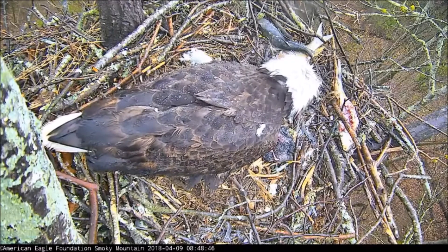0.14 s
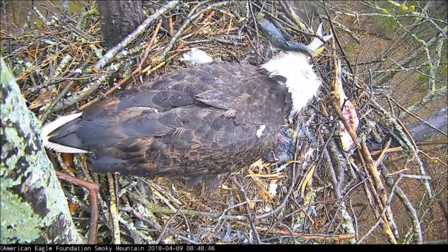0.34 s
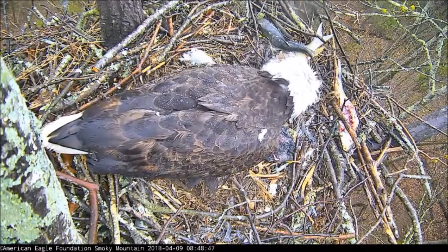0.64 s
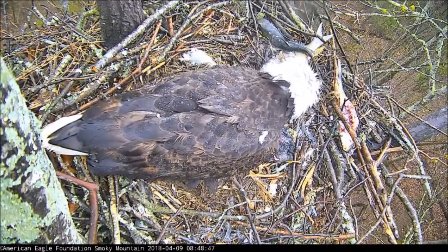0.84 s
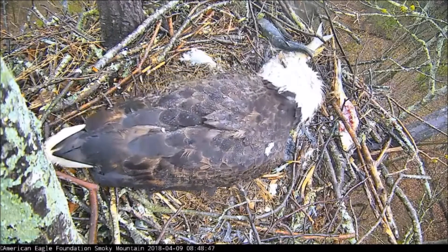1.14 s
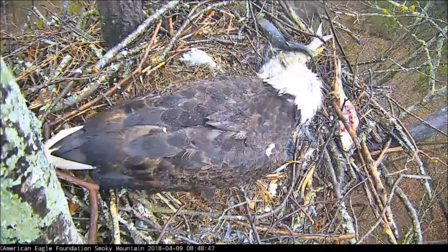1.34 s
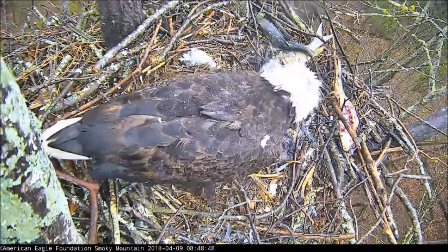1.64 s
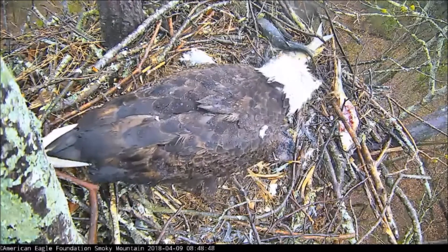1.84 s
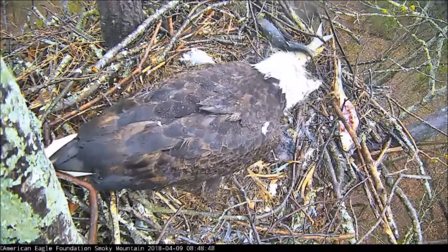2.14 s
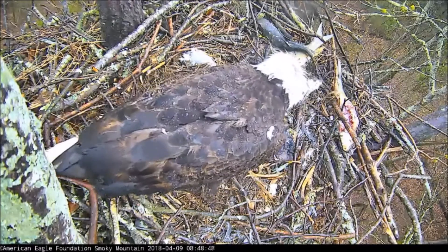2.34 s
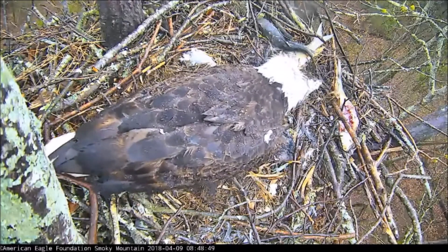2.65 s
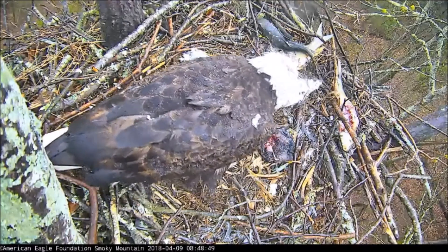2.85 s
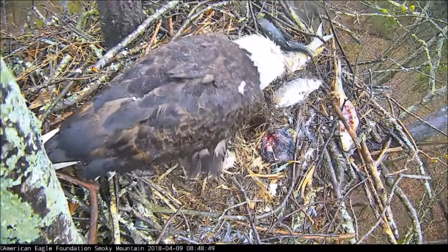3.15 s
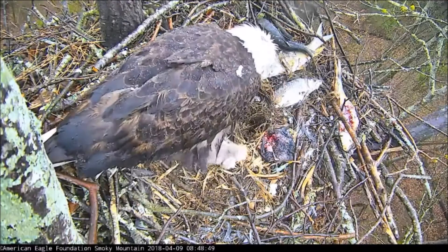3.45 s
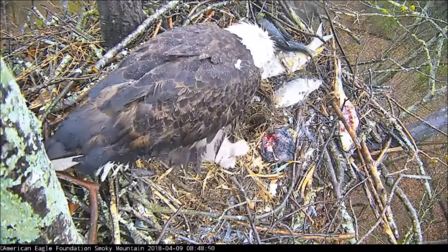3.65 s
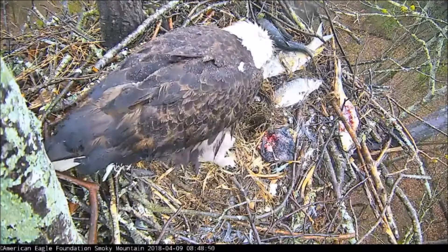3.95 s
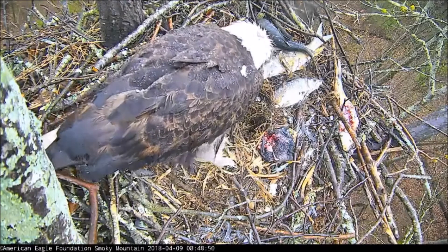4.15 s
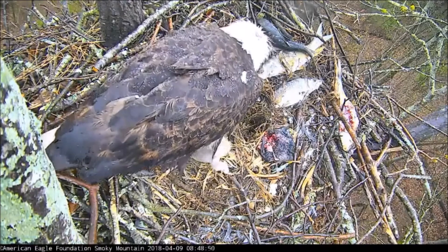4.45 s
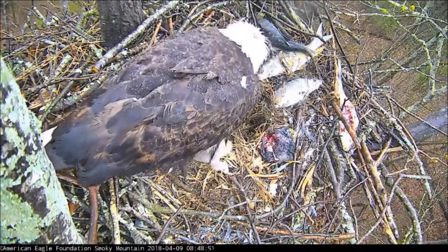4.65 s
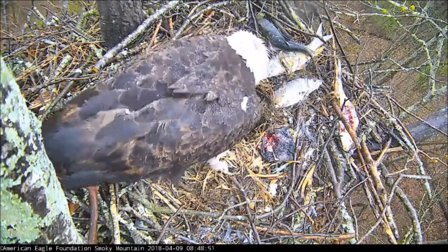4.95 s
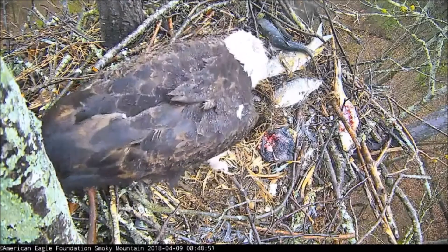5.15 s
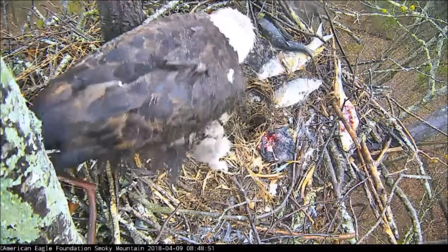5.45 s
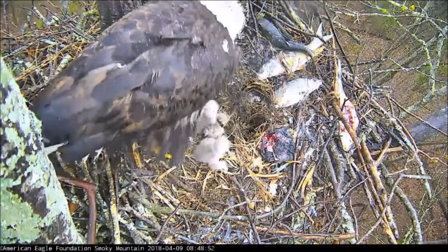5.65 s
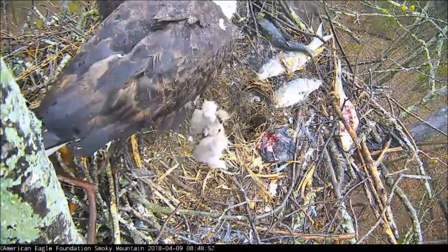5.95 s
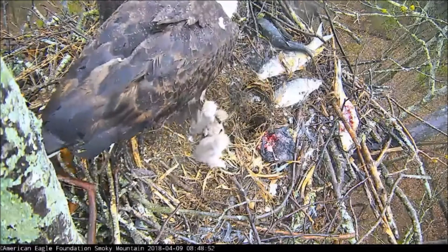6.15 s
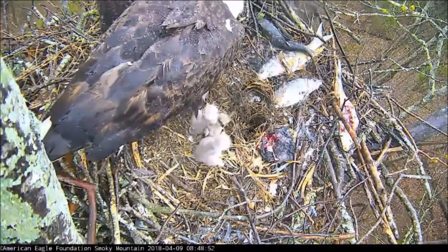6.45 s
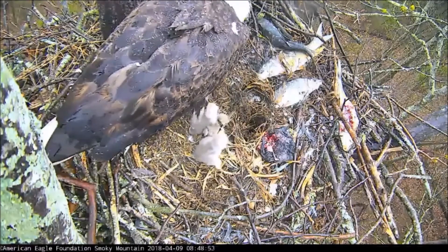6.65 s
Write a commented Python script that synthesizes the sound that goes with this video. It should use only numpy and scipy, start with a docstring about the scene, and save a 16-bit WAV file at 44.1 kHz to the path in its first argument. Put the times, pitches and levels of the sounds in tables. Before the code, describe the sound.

Steady wind rushes through a housed outdoor microphone, hollow and ringing in the upper mids, with slight hiss and whine. Over it, two young chicks call: wavering rising peeps, sliding whistles and fluttering twitters crowd the middle, followed by one longer cry that turns a little harsh. A few short twitters follow, then mostly wind and faint distant birds remain. Loud calls leave soft bass thumps and a brief diffuse echo.

```python
"""Eagle chicks peep, whistle, twitter and give one long arched cry in a treetop nest.
Their calls are near-sine glides with wavering pitch, fluttering level and breath; peeps add side tones.
Small songbirds call further off, over a faint chorus; the woods return a short diffuse echo.
Behind them, banded noise makes a rush of wind coloured by the ring of a boxed microphone's housing,
with a thin electronic whine and hiss; the uneven amplifier turns loudness into soft bass thumps."""
import sys
import numpy as np
from scipy import signal
from scipy.fft import rfft, irfft, next_fast_len
from scipy.io import wavfile
from scipy.ndimage import uniform_filter1d

SR = 44100
rng = np.random.default_rng(int(sys.argv[2]) if len(sys.argv) > 2 else 0)


def put_to_file(sound):
    """Save the sound as 16-bit audio at rate SR, in the file named by the first command-line argument."""
    columns = np.atleast_2d(sound).T  # one column per channel
    safe = np.clip(columns, -1, 1)
    whole_steps = np.round(safe * 32767)
    wavfile.write(sys.argv[1], SR, whole_steps.astype(np.int16))


N = 299439


def undb(db):
    """Decibels to gain."""
    return 10 ** (np.asarray(db) / 20)


def unit(x):
    """Scale to rms 1."""
    return x / np.sqrt(np.mean(x ** 2))


def walk(rate):
    """Smooth random wander, about rate turns a second, rms 1."""
    width = int(SR / rate)
    smooth = uniform_filter1d(rng.standard_normal(N), width)
    return unit(uniform_filter1d(smooth, width))


WHINE_HZ = 2729
WHINE_DB = -41.5  # the level wanders around this


def whine():
    """A thin steady tone of the electronics; its level wanders."""
    tone = np.sqrt(2) * np.sin(2 * np.pi * WHINE_HZ * np.arange(N) / SR)
    return tone * undb(WHINE_DB + 3.1 * walk(5.3))


# wind in the trees, level of its 700-2200 Hz part: (time [s], level [dB])
RUSH_LEVEL = [(0.0, -34), (0.32, -32.5), (1.0, -32.5), (1.93, -32), (2.72, -31), (3.03, -31.5), (3.74, -30),
              (5.26, -30.5), (5.79, -30.5), (6.47, -32), (6.79, -31.5)]
# relative spectrum of the wind before the housing rings: (frequency [Hz], density [dB per Hz])
RUSH_COLOUR = [(35, -61), (60, -24.5), (96, -18), (133, -21.5), (184, -21.5), (216, -23.5), (325, -22),
               (518, -21.5), (811, -10.5), (1400, -9), (1520, -6.5), (2590, -3.5), (3730, -14),
               (6460, -42.5), (7760, -57.5), (10100, -92), (17100, -120)]
# resonances of the microphone housing: (frequency [Hz], width [Hz], level [dB])
HOUSING_RINGS = [(2580, 180, -5), (2993, 840, -0.5), (4055, 200, -6.5)]
BASS_BANDS = 10  # half-octave bands from 16 Hz that buffet together
RUSH_ABOVE_DB = 6  # whole rush over its 700-2200 Hz part


def rush(flicker_db=1.38, swell_db=-0.35, buffet_db=2.0):
    """Wind noise in half-octave bands: all swell together, each flickers alone, the bass buffets as one."""
    size = next_fast_len(N)
    f = np.maximum(np.arange(size // 2 + 1) * SR / size, 1)
    hz, colour_db = np.transpose(RUSH_COLOUR)
    ring = sum(undb(ring_db) / (1 + ((f - ring_hz) / (width_hz / 2)) ** 2)
               for ring_hz, width_hz, ring_db in HOUSING_RINGS)
    colour = undb(np.interp(np.log(f), np.log(hz), colour_db))
    air = rfft(rng.standard_normal(size)) * colour * (1 + ring)
    swell = swell_db * walk(1.9)
    buffet = buffet_db * walk(16.0)
    out = 0
    for step in range(20):
        share = np.clip(1 - abs(2 * np.log2(f / 16) - step), 0, 1)  # overlapping triangular bands
        band = irfft(air * share, size)[:N]
        motion_db = swell + buffet * (step < BASS_BANDS) + flicker_db * walk(7.9)
        out = out + band * undb(motion_db)
    s, level_db = np.transpose(RUSH_LEVEL)
    return unit(out) * undb(RUSH_ABOVE_DB + np.interp(np.arange(N) / SR, s, level_db))


WOODS_T60_S, WOODS_DB = .16, -11


def woods(x):
    """Branches and trunks scatter a short diffuse echo: decaying noise with a soft onset."""
    t = np.arange(SR // 2) / SR
    decay = np.exp(-np.log(1000) * t / WOODS_T60_S)
    tail = rng.standard_normal(len(t)) * decay * (1 - np.exp(-t / 0.011))
    return undb(WOODS_DB) * signal.fftconvolve(x, tail / np.sqrt(np.sum(tail ** 2)))[:N]


WAVER = .003  # rms pitch waver, as a fraction of the pitch
# voice settings: (level [dB], breath [dB], flutter [dB])
PEEP_VOICE = (0, -26, 1.5)
WHISTLE_VOICE = (-.3, -10, 3)
TWITTER_VOICE = (0, -10, 2.5)
SONG_VOICE = (0, -12, 2.5)


def voice(calls, level_db, breath_db, flutter_db, edge_s=0.0018):
    """Near-sine syrinx notes; pitch wavers, level flutters, fast turbulence adds a breathy halo."""
    out, t = np.zeros(N), np.arange(N) / SR
    pitch = 1 + WAVER * walk(81)
    breath = 1 + undb(breath_db) * walk(700)
    flutter = undb(level_db + flutter_db * np.tanh(walk(130))) * breath
    for call, chance in zip(calls, rng.random(len(calls))):
        s, hz, db = np.transpose(call)
        span = slice(int((s[0] - edge_s) * SR), int((s[-1] + edge_s) * SR))
        now = t[span]
        glide = uniform_filter1d(np.interp(now, s, hz), size=150) * pitch[span]
        phase = 2 * np.pi * (np.cumsum(glide) / SR + chance)
        fade = np.clip(np.minimum(now - now[0], now[-1] - now) / (2 * edge_s), 0, 1)
        own = np.roll(flutter, int(chance * N))[span]  # overlapping notes flutter apart
        size = np.sqrt(2) * undb(np.interp(now, s, db)) * np.sin(fade * np.pi / 2) ** 2
        out[span] += size * own * np.sin(phase)
    return out


# how strongly the microphone hears a note by its pitch: (pitch [Hz], gain [dB])
PITCH_RESPONSE = [(2000, -7.5), (2600, -0.5), (3400, -6.5), (4000, -7), (4600, -11.5), (5000, -28),
                  (5600, -27), (7600, -43)]


def heard(s, hz, db):
    """A call table (s, Hz, dB) with the microphone's ear for its pitch."""
    return np.c_[s, hz, db + np.interp(hz, *np.transpose(PITCH_RESPONSE))]


NOTE_EDGE_DB = -2.5  # level arch: a short note's ends against its middle


def notes(rows):
    """Short notes: pitch bends through first, middle and last; level arches and may swell."""
    u = np.linspace(-1, 1, num=9)  # start to end of the note
    calls = []
    for s, length, first, middle, last, db, swell_db in rows:
        hz = middle + (last - first) / 2 * u + ((first + last) / 2 - middle) * u ** 2
        level_db = db + swell_db / 2 * u + NOTE_EDGE_DB * u ** 2
        calls.append(heard(s + length * (u + 1) / 2, hz, level_db))
    return calls


CHORUS_HZ = (2500, 3500)  # lowest and highest starting pitch
CHORUS_DB = -47  # quietest slide; the loudest is 6 dB above


def chorus(count=70):
    """Faint random slides of distant birds, 20-70 ms each."""
    when, pitch, length, slide, loud = rng.random((count, 5)).T
    start = .01 + when * (N / SR - .1)
    end = start + .02 + .05 * length
    hz = CHORUS_HZ[0] + pitch * (CHORUS_HZ[1] - CHORUS_HZ[0])
    end_hz = hz * (1.05 - .15 * slide)
    db = CHORUS_DB + 6 * loud
    calls = np.transpose([[start, hz, db], [end, end_hz, db]], (2, 0, 1))
    return voice(calls, *SONG_VOICE)


# scattered notes before the pitch response: songbirds, brief high side tones of the peeps, and faint high tones
# above the twitters: # (start [s], length [s], first pitch [Hz], middle pitch [Hz], last pitch [Hz], level
# [dB])
SCATTERED_NOTES = [ (.02, 0.032, 3730, 3740, 3850, -28.5), (.1, .045, 3780, 3810, 3780, -27.5),
                   (.15, .055, 3800, 3800, 3750, -33.5), (.35, .022, 6040, 7150, 7350, -14.5),
                   (.36, .05, 3770, 3730, 3680, -30), (.505, 0.046, 3620, 3660, 3570, -28),
                   (.59, .03, 3600, 3680, 3720, -31), (.643, 0.065, 3630, 3650, 3700, -30.5),
                   (.795, 0.034, 3720, 3650, 3620, -30), (.93, 0.029, 3620, 3630, 3560, -29.5),
                   (1.05, 0.043, 3580, 3640, 3720, -29), (1.34, 0.031, 3680, 3970, 3700, -31),
                   (1.772, .015, 4850, 4780, 4800, -25), (1.852, 0.023, 4560, 4560, 4540, -32),
                   (2.47, 0.099, 2290, 2160, 2180, -30), (2.795, 0.023, 4070, 4110, 4200, -32.5),
                   (2.99, 0.026, 2570, 2240, 2000, -28.5), (3.138, 0.024, 3250, 2760, 2405, -23.5),
                   (3.14, 0.042, 4150, 4100, 4030, -33), (3.288, 0.0057, 4360, 4730, 5130, -22),
                   (3.475, 0.051, 4040, 4120, 4030, -29), (3.51, 0.022, 2490, 2330, 2130, -22),
                   (3.575, 0.033, 2170, 2130, 2120, -25), (3.615, .04, 2150, 2120, 2080, -28),
                   (3.8, 0.061, 2150, 2130, 2110, -26), (4.015, 0.024, 5510, 5530, 5570, -21),
                   (4.05, .015, 5450, 5520, 5630, -25.5), (4.13, 0.082, 4250, 4130, 4100, -37),
                   (4.63, 0.048, 5940, 5630, 5520, -23.5), (4.682, 0.059, 4900, 4940, 4860, -20.5),
                   (4.729, .017, 4800, 4720, 4600, -23), (4.74, 0.018, 3970, 3910, 3890, -22.5),
                   (4.79, 0.016, 6400, 7100, 7610, -18), (5.75, .035, 3570, 3630, 3580, -33),
                   (5.792, 0.056, 3560, 3600, 3620, -32), (6.545, 0.022, 5940, 5550, 5030, -29), ]
# a row of like chips, before the pitch response: (start [s], level [dB])
CHIP_ROW = [(4.792, -17), (4.88, -21), (4.966, -20), (5.063, -25.5)]
# shape of one chip, dropping in pitch and swelling: (time from start [s], pitch [Hz], level offset [dB])
CHIP_SHAPE = [(0, 4230, -7), (.015, 4154, -3.5), (0.026, 3800, 2.5), (.034, 3730, 3)]


def songbirds_and_side_tones():
    """Scattered near-sine notes without swell: songbirds, high side tones of the peeps and faint high tones
    above the twitters; a row of chips."""
    t, hz, shape_db = np.transpose(CHIP_SHAPE)
    even = notes(np.c_[SCATTERED_NOTES, np.zeros(len(SCATTERED_NOTES))])
    chips = [heard(s + t, hz, db + shape_db) for s, db in CHIP_ROW]
    return voice(even + chips, *SONG_VOICE)


# short sliding twitters and a faint side tone under a peep, before the pitch response:
# (start [s], length [s], first pitch [Hz], middle pitch [Hz], last pitch [Hz], level [dB],
# swell from start to end [dB])
TWITTERS_AND_SIDE_TONE = [ (1.643, 0.033, 3360, 3520, 3580, -20.5, 11),
                          (1.674, 0.016, 3610, 3230, 2900, -19, 3),
                          (1.694, 0.038, 3050, 2700, 2420, -21, -14), (1.7, 0.02, 3480, 3490, 3560, -30, 0),
                          (1.737, 0.03, 2990, 3340, 3040, -22, -6),
                          (1.756, 0.017, 2620, 2566, 2620, -26, -3),
                          (1.778, 0.035, 2570, 3200, 3490, -19, -6),
                          (1.787, 0.026, 2520, 2530, 2620, -27, -2),
                          (1.811, 0.018, 2644, 2760, 3050, -18.5, 0),
                          (2.159, 0.0064, 2950, 2830, 2700, -16, 0),
                          (2.167, 0.023, 2725, 2500, 2420, -22, -4),
                          (2.221, 0.068, 2395, 2557, 3054, -19.5, 9.5),
                          (2.224, 0.018, 2610, 2690, 2900, -19.5, 7),
                          (2.244, 0.011, 3070, 3230, 3380, -17.5, 0),
                          (2.261, 0.011, 2576, 2680, 2760, -20, 1),
                          (2.273, 0.0079, 2780, 2830, 2950, -19.5, -1.5),
                          (2.253, 0.019, 3380, 3190, 3150, -21, -1),
                          (2.285, .008, 3000, 3190, 3350, -25, -2),
                          (2.291, 0.029, 2893, 3010, 3140, -21, -4),
                          (2.292, 0.016, 2620, 2720, 2740, -24, 1),
                          (2.306, 0.034, 3730, 2950, 2380, -18, -6),
                          (2.375, 0.023, 2420, 2660, 2850, -25, 4.5),
                          (2.64, 0.012, 3280, 3140, 3000, -22, -0.5),
                          (2.655, 0.012, 2800, 2585, 2380, -19.5, -4.5),
                          (2.658, 0.019, 4170, 3840, 3150, -22, 13),
                          (2.68, 0.016, 3950, 3540, 3150, -16.5, 4), (2.7, 0.011, 3220, 3120, 2950, -17, 0),
                          (2.69, 0.039, 2310, 2560, 2890, -19.5, 0),
                          (2.714, 0.053, 2435, 2535, 2570, -21.5, -4),
                          (2.72, 0.023, 3350, 3080, 2540, -17, 8),
                          (2.763, 0.02, 2490, 2550, 2660, -21.5, -2),
                          (2.745, .012, 2620, 2600, 2500, -27.5, 0),
                          (2.783, 0.0096, 2600, 2680, 2600, -22, 0),
                          (2.798, 0.0091, 2380, 2420, 2480, -19, 6),
                          (2.809, 0.013, 3030, 2980, 2900, -23, -2),
                          (2.812, 0.024, 2454, 2514, 2680, -19, 1.5),
                          (3.123, 0.014, 3080, 2810, 2540, -20, -19),
                          (3.182, 0.038, 3300, 3290, 3270, -29.5, 1),
                          (3.214, 0.026, 2386, 2640, 2800, -18.5, 5),
                          (3.236, 0.039, 2785, 2806, 2780, -22, -4.5),
                          (3.277, 0.03, 2490, 2580, 2600, -19.5, -4),
                          (3.296, 0.022, 3450, 3740, 3560, -28, 1),
                          (3.32, 0.025, 3206, 2980, 2720, -24, -1.5),
                          (3.733, 0.037, 2438, 2670, 2710, -21, 8),
                          (3.776, 0.0092, 2390, 2500, 2680, -22.5, -0.5),
                          (3.83, 0.028, 3190, 3220, 3000, -23, 0), (3.904, .045, 3930, 3900, 3880, -32, 3),
                          (3.998, 0.062, 4150, 4190, 4270, -22, 1),
                          (4.058, .009, 4300, 4310, 4250, -25, -1),
                          (4.089, 0.008, 4100, 4060, 4050, -24, -1),
                          (4.104, .009, 4270, 4280, 4300, -28, -1),
                          (4.804, 0.032, 3600, 2846, 2650, -22.5, -7),
                          (5.185, 0.022, 3480, 3570, 3620, -18.5, -3),
                          (5.205, 0.016, 3490, 3240, 2990, -16, -1),
                          (5.233, 0.032, 2980, 3010, 2900, -20, -7),
                          (5.278, 0.0068, 3125, 3300, 3520, -17, 0),
                          (5.287, 0.037, 2784, 2660, 2580, -21, 2),
                          (5.329, .016, 2610, 2580, 2560, -20, -4),
                          (5.669, 0.016, 3260, 3050, 2720, -21.5, 2),
                          (5.685, 0.034, 2690, 2518, 2470, -19, 4.5),
                          (5.727, 0.015, 2420, 2340, 2370, -26, -0.5),
                          (5.761, 0.011, 2490, 2460, 2530, -19.5, -1),
                          (5.781, 0.019, 2510, 2476, 2420, -17.5, -3), ]
OVERTONE_DB = -10.5  # added to 1.2 times the note's level in dB


def twitters_and_side_tone():
    """Stuttering slides and a peep's side tone, each with a faint overtone from 2.2 to 1.7 times the pitch."""
    scale = [1, 0.98, 2.2, 2.2, 1.7, 1.2, 1.1]  # one factor a column
    overtones = np.array(TWITTERS_AND_SIDE_TONE) * scale + [0, 0, 0, 0, 0, OVERTONE_DB, 0]
    return voice(notes(TWITTERS_AND_SIDE_TONE) + notes(overtones), *TWITTER_VOICE)


# whistles of the other chick, before the pitch response: (start [s], length [s], first pitch [Hz],
# held pitch [Hz], level [dB], level slope [dB per s])
WHISTLE_NOTES = [(1.924, 0.16, 3180, 3410, -25.5, 10), (2.096, 0.111, 3380, 3360, -32, 0),
                 (2.342, 0.075, 2650, 3410, -24.5, -1), (2.428, 0.1, 3370, 3320, -28, 0),
                 (2.855, 0.093, 2450, 3313, -21, -5), (2.951, .11, 3280, 3320, -30, -19),
                 (3.366, 0.1, 2540, 3250, -19, -39), (3.897, 0.13, 2600, 3220, -21.5, -19)]
WHISTLE_SETTLE_S = 0.025  # time constant of the slide to the held pitch
WHISTLE_START_S, WHISTLE_START_DB = 0.003, -4  # soft start


def whistles():
    """Pitch settles exponentially to a held note that fades, stays even or swells."""
    calls = []
    for s, length, first_hz, held_hz, db, slope_db in WHISTLE_NOTES:
        t = np.linspace(0, length, num=40)
        hz = held_hz + (first_hz - held_hz) * np.exp(-t / WHISTLE_SETTLE_S)
        soft_start_db = WHISTLE_START_DB * np.exp(-t / WHISTLE_START_S)
        calls.append(heard(s + t, hz, db + slope_db * t + soft_start_db))
    return voice(calls, *WHISTLE_VOICE)


# long rising peeps of the nearer chick, one table a call, before the pitch response:
# (time [s], pitch [Hz], effort [dB])
PEEP_CALLS = [
    [(0.48, 3440, -39), (0.494, 3830, -27), (0.504, 4020, -20.5), (0.516, 4270, -24), (0.533, 4420, -25),
     (0.555, 4220, -26), (0.578, 4520, -22.5), (0.61, 4600, -26), (0.636, 4490, -22), (0.668, 4840, -22),
     (0.686, 5000, -19), (0.694, 5120, -39), (0.708, 5130, -35), (0.714, 5150, -14), (0.738, 4680, -19),
     (0.75, 4320, -20), (0.757, 3950, -26.5), (0.761, 3180, -13), (0.766, 2850, -19)],
    [(2.745, 2660, -24), (2.757, 3285, -24), (2.763, 3580, -28), (2.772, 3680, -21), (2.779, 3700, -36),
     (2.787, 3720, -19.5), (2.81, 3850, -24), (2.822, 3910, -29.5), (2.828, 3950, -19.5),
     (2.875, 4100, -18), (2.895, 4330, -20.5), (2.903, 4420, -32), (2.915, 4270, -25), (2.93, 4470, -25),
     (2.96, 4646, -14), (3.05, 4870, -15), (3.075, 4970, -26), (3.1, 4810, -13), (3.135, 3900, -20.5)],
    [(3.815, 3390, -26), (3.826, 3850, -21), (3.84, 4000, -19.5), (3.884, 4230, -20.5), (3.895, 4480, -29),
     (3.93, 4500, -32), (3.955, 4680, -25), (3.963, 4880, -38), (3.97, 5030, -9), (3.984, 5260, -13),
     (3.99, 5220, -20), (4.012, 5170, -14), (4.022, 5000, -33), (4.03, 4890, -15), (4.075, 5160, -8),
     (4.086, 4910, -13), (4.09, 4780, -34), (4.095, 4710, -19), (4.099, 4370, -28), (4.104, 4170, -13),
     (4.11, 3650, -27), (4.116, 3000, -8.5), (4.121, 2850, -28)],
]


def peeps():
    """Long syrinx notes whose pitch and effort glide between the table rows."""
    calls = []
    for s, hz, db in map(np.transpose, PEEP_CALLS):
        t = np.linspace(s[0], s[-1], num=80)
        calls.append(heard(t, np.interp(t, s, hz), np.interp(t, s, db)))
    return voice(calls, *PEEP_VOICE)


# one long arched cry before the pitch response: (time [s], pitch [Hz], level [dB])
CRY_GLIDE = [(4.728, 2356, -24.5), (4.746, 2424, -21), (4.758, 2680, -23), (4.77, 2950, -18),
             (4.796, 2980, -21), (4.81, 3120, -26), (4.835, 3477, -21), (4.9, 3440, -17), (5.02, 3430, -20),
             (5.036, 3427, -33.5), (5.043, 3440, -14.5), (5.062, 3468, -14.5), (5.075, 3443, -30),
             (5.087, 3460, -18), (5.1, 3437, -15), (5.176, 3284, -20), (5.183, 3260, -23),
             (5.192, 3190, -19), (5.222, 3140, -33)]
OCTAVE_DB, OCTAVE_GROWS_DB_S = -72.5, 38.5  # octave at the start of the cry; it brightens
HARSH_S = (5.09, 5.175)  # start and end of the harsh stretch near the cry's end
# extra partials of the harsh stretch: (multiple of the pitch, level [dB])
HARSH_PARTIALS = [(1.5, -56), (1.745, -60), (1.86, -63)]


def cry():
    """The long cry, its octave, and partials in between while the syrinx vibrates unevenly."""
    s, hz, db = np.transpose(CRY_GLIDE)
    octave_db = OCTAVE_DB + OCTAVE_GROWS_DB_S * (s - s[0])
    clean = voice([heard(s, hz, db), np.c_[s, 2 * hz, octave_db]], *PEEP_VOICE)
    ends_hz = np.interp(HARSH_S, s, hz)
    extra = [np.c_[HARSH_S, multiple * ends_hz, [level_db, level_db]]
             for multiple, level_db in HARSH_PARTIALS]
    return clean + voice(extra, *TWITTER_VOICE)


def scene():
    """Birds with their echo over wind and whine."""
    chicks = peeps() + whistles() + cry()
    birds = chicks + twitters_and_side_tone() + songbirds_and_side_tones() + chorus()
    return (birds + woods(birds) + rush() + whine())[None]


UNEVEN, THUMP_HZ = .68, (30, 210)  # gain of the squared sound; the band it leaks into
SQUASH = 2.2  # loud peaks thump less than in proportion
HISS_DB = -87.5  # before the last filter
TOP_HZ, HISS_TOP_HZ = 7900, 15700


def record(dry):
    """The amplifier squares a little of the sound, so swells leak out as bass; then the top is cut."""
    squared = (np.tanh(SQUASH * dry) / SQUASH) ** 2
    thump_band = signal.butter(3, THUMP_HZ, "bandpass", fs=SR, output="sos")
    thump = signal.sosfilt(thump_band, squared)
    top_cut = signal.ellip(8, .2, 60, TOP_HZ, fs=SR, output="sos")
    band = signal.sosfilt(top_cut, dry + UNEVEN * thump)
    hiss = undb(HISS_DB) * rng.standard_normal(dry.shape)
    hiss_cut = signal.ellip(8, .2, 70, HISS_TOP_HZ, fs=SR, output="sos")
    return signal.sosfilt(hiss_cut, band + hiss)


dry = scene()
out = record(dry)
put_to_file(out)
```